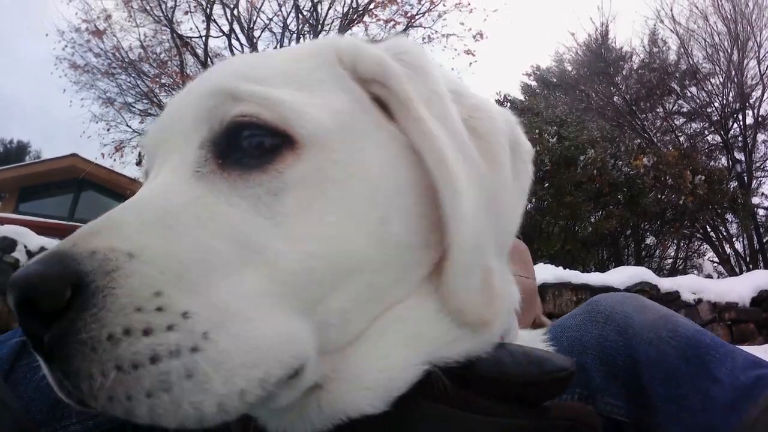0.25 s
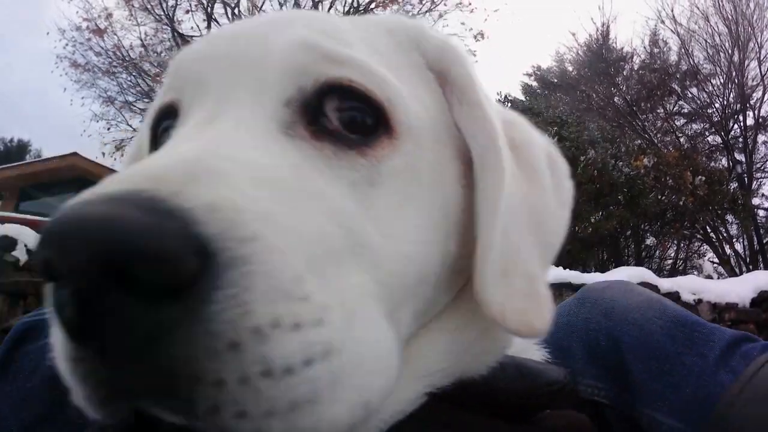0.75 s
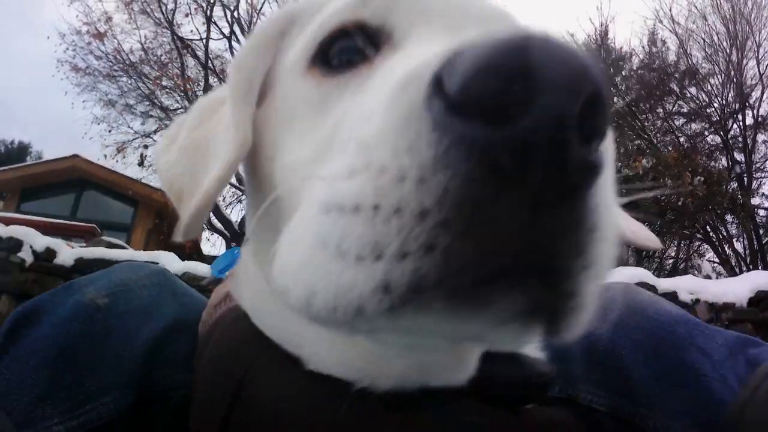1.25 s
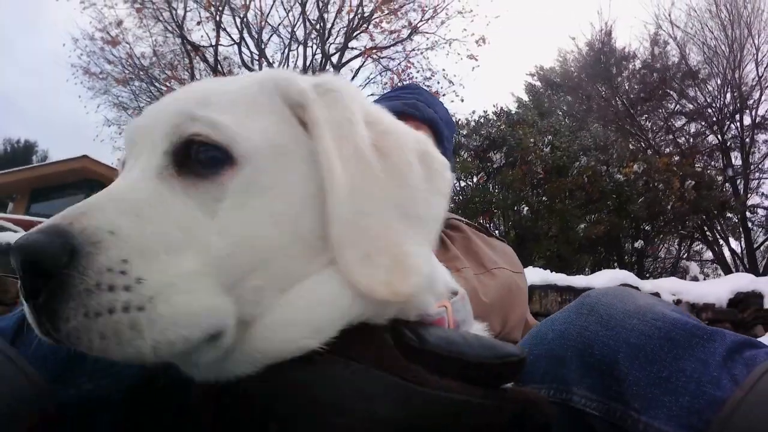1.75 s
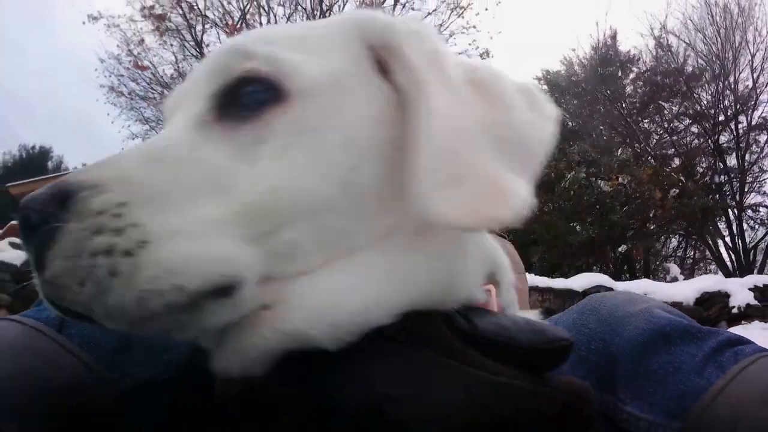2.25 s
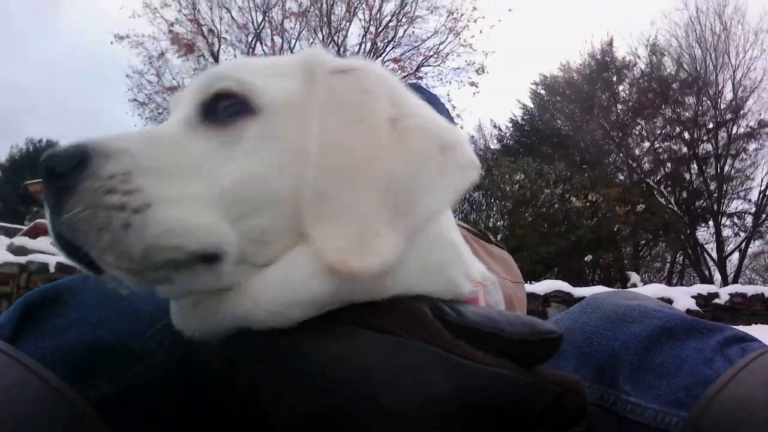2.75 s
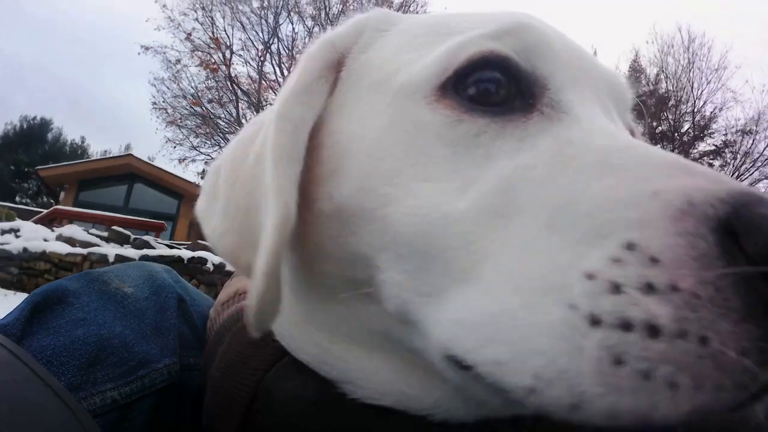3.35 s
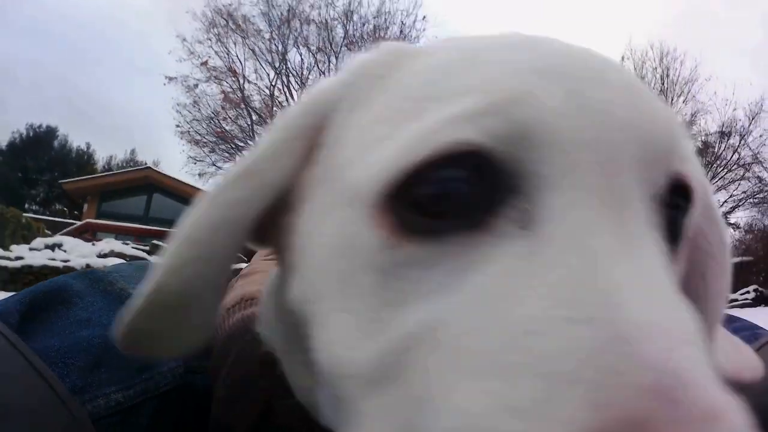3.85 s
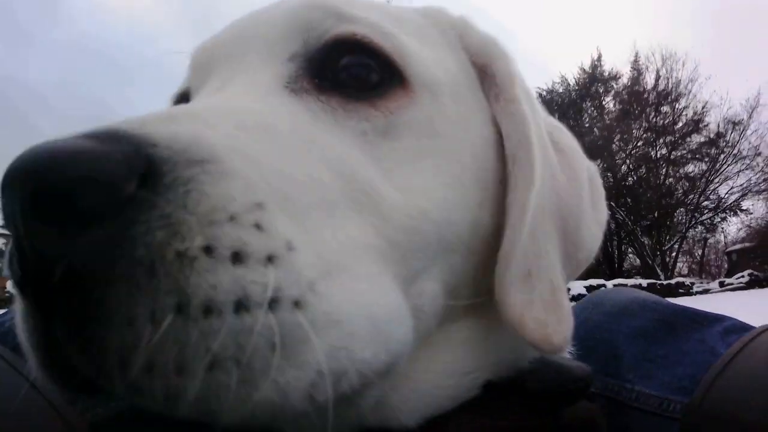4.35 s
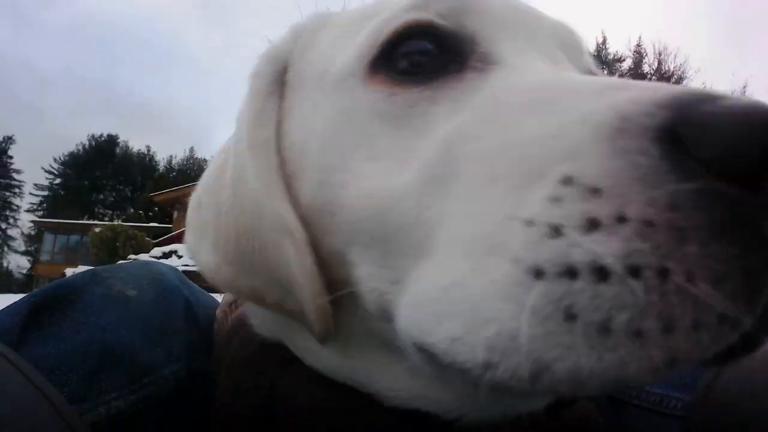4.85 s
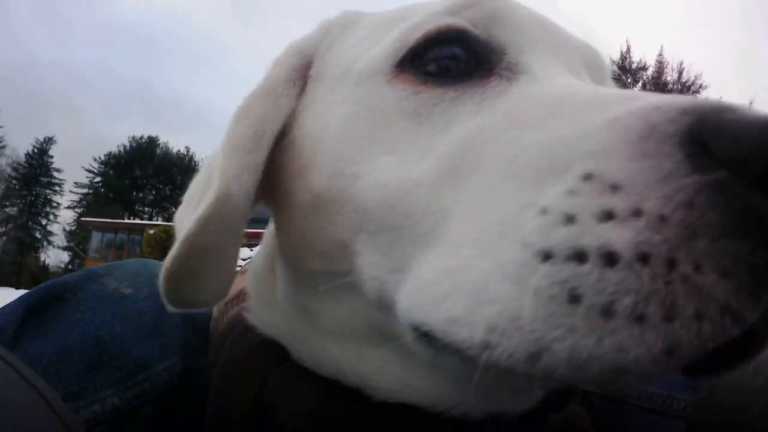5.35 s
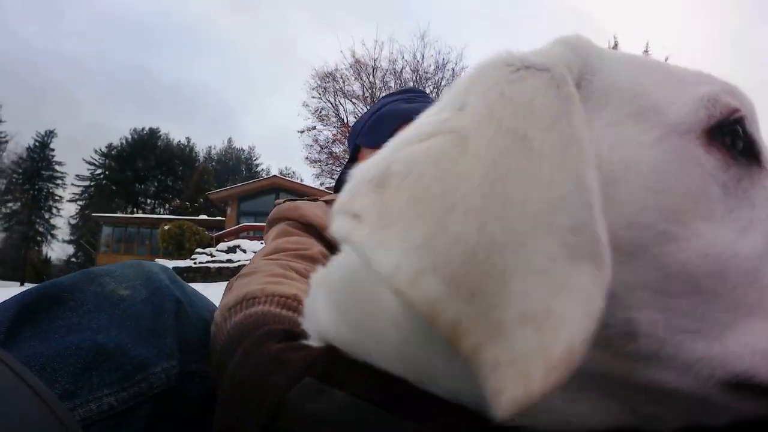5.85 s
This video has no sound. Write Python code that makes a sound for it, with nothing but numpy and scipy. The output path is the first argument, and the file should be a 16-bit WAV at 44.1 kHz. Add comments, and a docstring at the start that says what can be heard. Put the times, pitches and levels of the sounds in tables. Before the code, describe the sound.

Close, dry sound picked up by a small camera fixed to a plastic kayak on a snowy slope. It begins almost silent, with faint creaks and tiny scuffs. At about 0.45 s a hard, hollow knock rings the shell, followed by a short scuff and small dry ticks. Weak shifts and light taps continue, with a clearer bump near 1.14 s. At about 1.26 s the boat is pushed off with a sudden gritty scrape and crisp snaps; it dips briefly around 1.4 s, then builds into a loud, coarse rushing scrape by 2.4 s. Airy snow hiss and low wind-like thuds ride along. Hollow jolts strike near 2.5, 3.05, 3.23, 3.7, 4.34 and 5.2 s, with booming ruts between and occasional sharp ticks. The scrape is strongest around 4.7 s, eases near 5.1 s, swells again and stays loud to the end, just after 6 s.

```python
"""Faint scuffs and a hard knock open the scene: a plastic kayak is nudged and pushed off, then scrapes down a
snowy slope. A small camera fixed to the hull hears it all. Blows are half-sine pushes that ring the hull's
resonances; snow and ruts are streams of random grains that drive the same resonances, and the low ones boom
over ruts. Airborne crystal hiss, dry ticks and soft air thuds are shaped noise. The tallest peaks are
flattened."""
import sys
import numpy as np
from scipy import signal
from scipy.fft import rfft, irfft, next_fast_len
from scipy.io import wavfile
from scipy.ndimage import uniform_filter1d, map_coordinates

SR = 44100
rng = np.random.default_rng(int(sys.argv[2]) if len(sys.argv) > 2 else 0)


def unload_audio(sound):
    """Save the sound as a 16-bit wav file, at the path given as the first command line argument."""
    columns = np.transpose(np.atleast_2d(sound))
    # keep every value between -1 and 1, then stretch to whole-number steps
    steps = np.round(np.clip(columns, -1, 1) * 32767)
    wavfile.write(sys.argv[1], SR, steps.astype(np.int16))


def invert_db(x):
    """Field ratio 10**(x/20) for x, a level in decibels (scalar or array-like)."""
    u = np.asarray(x, float) / 20
    return 10 ** u


N = 269451


def unit(x):
    """Scaled to rms 1."""
    return x / np.sqrt(np.mean(x ** 2) + 1e-20)


def curves(rows):
    """One value per sample for each column after the time."""
    s, *cols = np.transpose(rows)
    return [np.interp(np.arange(N) / SR, s, c) for c in cols]


def wobble(rate):
    """A smooth random curve, rate knots a second."""
    knots = rng.standard_normal(int(N * 200 / SR))
    return map_coordinates(knots, [np.arange(N) * rate / SR])


def filtered(x, response):
    """x shaped by a gain or complex response, given as a function of frequency."""
    m = next_fast_len(N + SR // 2)
    return irfft(rfft(x, m) * response(np.fft.rfftfreq(m, 1 / SR)), m)[:N]


def colour(points):
    """Gain through (Hz, dB) points on a log frequency axis."""
    f, db = np.transpose(points)
    return lambda hz: invert_db(np.interp(np.log(hz + 1), np.log(f + 1), db))


def band(low_hz, high_hz):
    """Fourth-order band-pass gain."""
    return lambda hz: 1 / np.sqrt((1 + (low_hz / (hz + 1)) ** 8) * (1 + (hz / high_hz) ** 8))


def grit(spread_db):
    """Noise grains of uneven size: a positive spread makes rare larger ones, a negative spread rare weaker ones."""
    return unit(rng.standard_normal(N) * invert_db(spread_db * rng.exponential(size=N)))


def swells(rows, rise_s, fall_s):
    """Power sum of (start s, length s, dB) events that rise, hold and die away."""
    t = np.arange(N) / SR
    power = np.zeros(N)
    for start, length, db in rows:
        rise = np.sin(np.pi / 2 * np.clip((t - start) / rise_s, 0, 1)) ** 2
        fall = np.exp(-np.clip(t - start - length, 0, None) / fall_s)
        power += (invert_db(db) * rise * fall) ** 2
    return power


def follows(control_db, level_db, db_per_db):
    """Power of a layer that grows with a control and sits at level_db when the control is at -18.5 dB."""
    return invert_db(level_db + db_per_db * (control_db + 18.5)) ** 2


# The boat at rest, creaking faintly.
# The single row: scrape, shudder, heave, hiss and buffet levels, all in dB.
REST_LEVELS = [-45.5, -45.5, -50, -69.5, -55]


def at_rest(layer):
    """Power of the steady floor under one layer."""
    names = ["scrape", "shudder", "heave", "hiss", "buffet"]
    return invert_db(REST_LEVELS[names.index(layer)]) ** 2


# How hard the slope works the hull during the run.
# Each row: time in seconds, snow scrape in dB, roughness of the ground in dB.
SLOPE = [(1.255, -37, -30.5), (1.268, -19.5, -19), (1.322, -14.5, -15), (1.36, -17.5, -19),
         (1.41, -24, -20), (1.65, -19, -21), (1.95, -14.5, -21), (2.35, -12, -18.5), (2.8, -10, -16),
         (2.97, -11.5, -18.5), (3.2, -10, -18.5), (3.65, -9.5, -18.5), (4.0, -11.5, -18), (4.35, -10, -16),
         (4.68, -7.5, -15), (4.82, -9, -16), (5.0, -10.5, -16), (5.09, -12.5, -24), (5.15, -11.5, -18.5),
         (5.19, -11, -18), (5.45, -8.5, -17.5), (5.92, -9.5, -17), (6.0, -12.5, -17), (6.11, -11.5, -23.5)]


def sliding():
    """Scrape and roughness in dB, at -120 dB until the push-off."""
    return np.where(np.arange(N) / SR < SLOPE[0][0], -120, curves(SLOPE))


# Small shifts of the boat before it is pushed off.
# Each row: start in seconds, length in seconds, scrape level in dB, shudder over scrape in dB.
SMALL_SHIFTS = [(0, 0.02, -36.5, 5), (0.043, .13, -38.5, 4), (0.348, 0.11, -43, -4.5),
                (0.449, 0.01, -27, -8), (0.479, .11, -36, 3.5), (.7, 0.041, -46, 1),
                (0.896, 0.037, -39.5, 3), (0.958, .025, -42, 5), (0.995, .05, -46.5, 6),
                (1.057, .03, -42.5, 9.5), (1.093, 0.033, -38, 3), (1.126, 0.031, -31, 3.5),
                (1.17, .05, -37, -1)]


def scuffing():
    """Powers of the scrape and the shudder as the boat catches and slips unevenly."""
    scrapes = [(s, length, db) for s, length, db, _ in SMALL_SHIFTS]
    shudders = [(s, length, db + over) for s, length, db, over in SMALL_SHIFTS]
    scuffs = invert_db(5.2 * wobble(45)) * swells(scrapes, rise_s=0.0068, fall_s=0.022)
    shifts = invert_db(5.2 * wobble(29.9)) * swells(shudders, rise_s=0.0068, fall_s=0.022)
    return scuffs, shifts


def resonance(hz, centre_hz, width_hz):
    """Complex response of one damped mode, 1 at its centre."""
    return 1j * hz * width_hz / (centre_hz ** 2 - hz ** 2 + 1j * hz * width_hz)


# Ringing modes of the plastic shell.
# Each row: centre in Hz, width in Hz, strength in dB.
HULL_MODES = [(25, 12, -33), (114.4, 4.5, -3), (128.96, 4.34, 1.5), (210, 34, -18), (263.3, 42, -13),
              (337.8, 20, -1), (486.7, 44, -1.5), (646, 87, -12), (764.6, 26.3, -10.5), (941.5, 106, -21),
              (1248.4, 136, 1.5), (1404.5, 213.5, 3.5), (1504, 149, 4), (1812, 139, -7), (1926, 86, -4.5),
              (2218, 275, -15), (2580, 194, -14), (3286, 227, -14.5), (4000, 220, -26.5),
              (4400, 360, -30.5)]
# Places where the hull barely moves under the camera.
# Each row: centre in Hz, width in Hz, depth of the dip in dB (negative lifts instead).
HULL_NODES = [(151.4, 43, 12.5), (410, 22, 12), (871, 82, -8), (1044.5, 185, 14), (2977, 325, 13),
              (3700, 240, 4.5)]


def hull(hz):
    """Causal response of the shell: its modes summed, then thinned at the nodes."""
    response = 0
    for k, (centre, width, db) in enumerate(HULL_MODES):
        # the first three move in step, so the pair above 100 Hz starts together and then beats;
        # from there on neighbours move in opposite senses
        sense = (-1) ** max(k - 1, 1)
        response = response + sense * invert_db(db) * resonance(hz, centre, width)
    for centre, width, depth_db in HULL_NODES:
        response = response * (1 - (1 - invert_db(-depth_db)) * resonance(hz, centre, width))
    return response


def through_hull(force, low_hz, high_hz):
    """A force heard through the shell within one band, at rms 1."""
    return unit(filtered(force, lambda hz: hull(hz) * band(low_hz, high_hz)(hz)))


# Tone of the microphone's own hiss.
# Each row: frequency in Hz, relative gain in dB.
MIC_TONE = [(20, 2.5), (60, -4), (3000, -6), (11300, -7.5), (11600, -32), (16000, -18)]


def self_noise():
    """The microphone's own hiss: steady coloured noise at -68 dB rms."""
    return invert_db(-68.0) * unit(filtered(rng.standard_normal(N), colour(MIC_TONE)))


def buffet():
    """Moving air thuds softly on the microphone port: wavering noise around 17 to 32 Hz."""
    _, rough_db = sliding()
    moving = uniform_filter1d(follows(rough_db, level_db=-45.5, db_per_db=1.2), size=SR // 10)
    thuds = unit(filtered(rng.standard_normal(N), band(17, 32)))
    gusts = invert_db(3 * wobble(9) + 3 * wobble(2.5))
    return np.sqrt(at_rest("buffet") + moving) * gusts * thuds


# Small dry ticks.
# Each row: start in seconds, peak in dB ahead of the housing's cut-off, centre in Hz.
SNAPS = [(.455, -40, 4000), (0.534, -28, 2700), (.587, -32, 2000), (0.7984, -33, 1700), (0.919, -46, 2400),
         (1.058, -40, 2400), (1.277, -31, 3500), (1.296, -16, 5500), (1.299, -25.5, 4000),
         (1.3372, -11.5, 4740), (1.362, -33, 5000), (1.378, -25, 5000), (1.408, -33, 5000),
         (1.456, -23, 4500), (2.439, -15.5, 6000), (2.7244, -12.5, 6070), (2.9063, -18.5, 6000),
         (3.4043, -16, 6100), (4.446, -22.5, 5960), (4.7282, -11.5, 5030), (5.4806, -22, 6000),
         (5.774, -9.5, 5930)]


def ticks():
    """Short dry snaps: bursts of band-passed noise, fading out above the housing's cut-off."""
    snaps, t = np.zeros(N + SR), np.arange(SR // 100) / SR
    for s, db, hz in SNAPS:
        edges = np.clip([hz / 3, hz * 1.7], 300, 9000)
        burst = invert_db(-60 * t / 0.006) * rng.standard_normal(len(t))  # 60 dB down in 6 ms
        snap = signal.sosfilt(signal.butter(2, edges, "band", fs=SR, output="sos"), burst)
        snaps[round(s * SR):][:len(t)] += invert_db(db) * snap / np.abs(snap).max()
    return filtered(snaps[:N], band(400, 5700))


# Tone of the snow crystals in the air.
# Each row: frequency in Hz, relative gain in dB.
CRYSTAL_TONE = [(2500, -41.5), (4000, 9.5), (5200, 2.5), (6500, 0.5), (7600, 2.5), (9000, -8),
                (11000, -14.5), (11600, -53.5), (16000, -45)]


def hiss(scrape_db, crust):
    """Crystals hiss in the air: coloured grains that grow faster than the scrape."""
    grains = invert_db(0.6 * crust + 1.0 * wobble(14)) * grit(spread_db=-1.0)
    power = at_rest("hiss") + follows(scrape_db, level_db=-60, db_per_db=1.79)
    return np.sqrt(power) * unit(filtered(grains, colour(CRYSTAL_TONE)))


# The hull rocks over a rut and booms.
# Each row: start in seconds, length in seconds, level in dB.
RUTS = [(2.48, 0.026, -16.5), (2.694, 0.048, -25.5), (2.747, 0.055, -20), (2.955, 0.035, -21),
        (3.1, 0.042, -15.5), (3.228, 0.079, -22), (3.385, 0.035, -20), (3.519, 0.075, -21),
        (3.677, 0.074, -11), (3.878, 0.035, -17.5), (4.148, 0.098, -17.5), (4.315, 0.067, -16),
        (4.466, 0.086, -17), (4.598, 0.033, -20.5), (4.714, 0.03, -14.5), (4.883, 0.026, -20.5),
        (5.171, 0.12, -16), (5.385, 0.063, -14.5), (5.481, 0.053, -22), (5.538, 0.049, -23.5),
        (5.634, 0.03, -21.5), (5.998, 0.041, -20.5)]


def heave(rough_db, shifts):
    """The slope stirs the hull's low pair with noise, and a rut drives it more steadily while it passes."""
    stirred = through_hull(rng.standard_normal(N), 80, 188)
    envelope = np.abs(signal.hilbert(stirred))
    boom = unit(stirred / (envelope + 0.29))  # evens out the random swelling
    power = at_rest("heave") + invert_db(-6) * shifts + follows(rough_db, level_db=-28.5, db_per_db=2.05)
    return np.sqrt(power) * stirred + np.sqrt(swells(RUTS, rise_s=0.018, fall_s=0.016)) * boom


def shudder(rough_db, shifts, crust):
    """Ruts shake the shell: uneven grains ring its modes from 140 to 1015 Hz."""
    force = invert_db(0.8 * crust + 1.62 * wobble(12)) * grit(spread_db=1.0)
    power = at_rest("shudder") + shifts + invert_db(rough_db) ** 2
    return np.sqrt(power) * through_hull(force, 140, 1015)


def scrape(scrape_db, scuffs, crust):
    """Fine snow scrapes the shell: tiny grains ring its modes from 810 to 4210 Hz."""
    force = invert_db(0.12 * crust + 0.74 * wobble(60)) * grit(spread_db=1.1)
    power = at_rest("scrape") + scuffs + invert_db(scrape_db) ** 2
    return np.sqrt(power) * invert_db(0.3 * wobble(9)) * through_hull(force, 810, 4210)


def slide():
    """Hiss, heave, shudder and scrape share one slope, one set of small shifts and one crust."""
    scrape_db, rough_db = sliding()
    scuffs, shifts = scuffing()
    crust = wobble(25)  # harder and softer snow passing underneath
    return (hiss(scrape_db, crust) + heave(rough_db, shifts)
            + shudder(rough_db, shifts, crust) + scrape(scrape_db, scuffs, crust))


# Blows and bumps on the hull.
# Each row: start in seconds, relative strength of the push in dB, contact time in ms.
BLOWS = [(0.019, -28, 1.1), (0.45, -21, 0.67), (0.457, 3.5, 5.25), (.460, -11.5, 1.4), (.498, -28, 0.66),
         (.726, -20.5, 2.95), (0.857, -44.5, 0.4), (0.911, -21.5, 2), (0.962, -54, .5), (1.055, -26, 1.1),
         (1.096, -26, 0.76), (1.136, -5.5, 3.9), (1.29, -18, 0.75), (2.12, -25, 2.9), (2.487, 0, 11),
         (3.049, 1, 2.1), (3.229, -1, 2.2), (3.684, 1.5, 3.1), (4.339, -1.5, 2.7), (4.728, -9, 2.1),
         (5.179, -5.5, 2.6)]


def bumps():
    """Each blow is a half-sine push on the hull: the longer the contact, the duller the ring."""
    force = np.zeros(N + SR)
    for s, db, contact_ms in BLOWS:
        push = np.sin(np.pi * np.arange(0, 1, 1000 / (SR * contact_ms)))
        force[round(s * SR):][:len(push)] += invert_db(db) * push / push.sum()
    # the camera hears little of the slow push itself: a gentle low cut at 45 Hz
    return invert_db(51.5) * filtered(force[:N], lambda hz: hull(hz) * 1j * hz / (45 + 1j * hz))


def scene():
    """Everything reaches one microphone."""
    return (buffet() + ticks() + slide() + bumps())[None]


def roll_off(x):
    """The treble ends steeply here."""
    return signal.sosfilt(signal.butter(12, 11500, fs=SR, output="sos"), x)


def record(dry):
    """The microphone adds its own hiss, and the tallest peaks are flattened."""
    x = dry + self_noise()
    top, hardness = 0.94, 30  # ceiling at 0.94 of full scale, with a sharp knee
    mix = x / (1 + np.abs(x / top) ** hardness) ** (1 / hardness)
    return roll_off(mix)


dry = scene()
out = record(dry)
unload_audio(out)
```